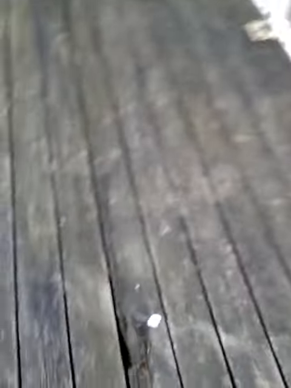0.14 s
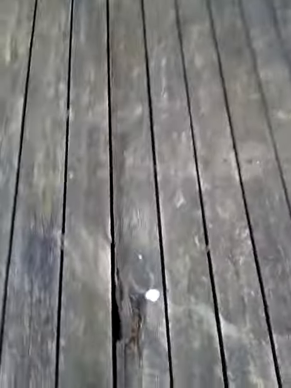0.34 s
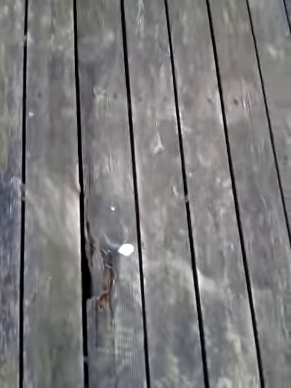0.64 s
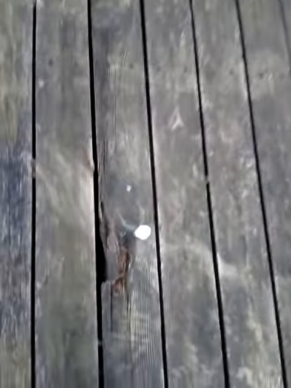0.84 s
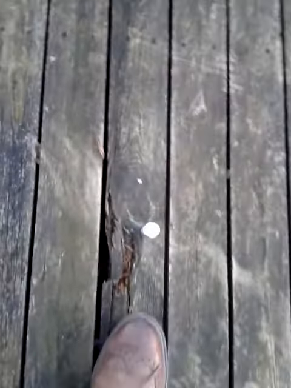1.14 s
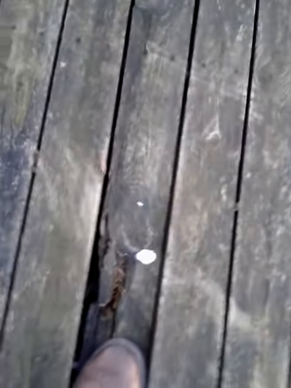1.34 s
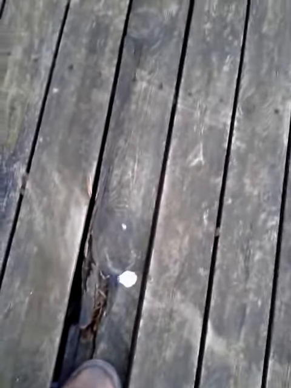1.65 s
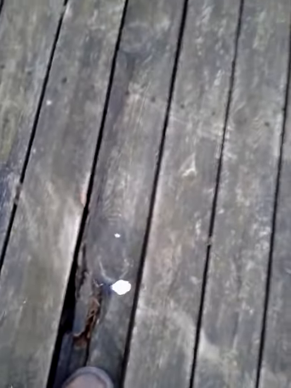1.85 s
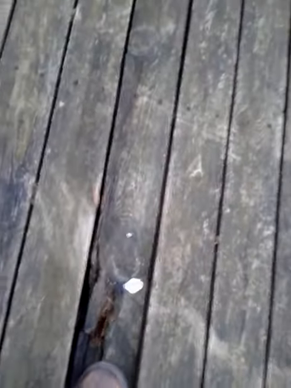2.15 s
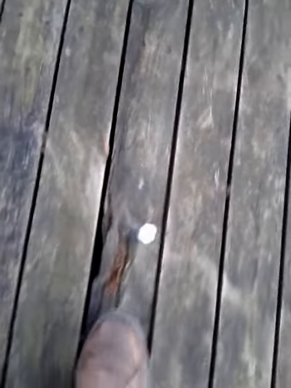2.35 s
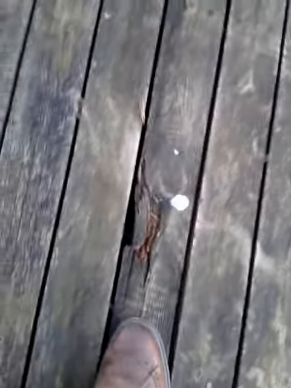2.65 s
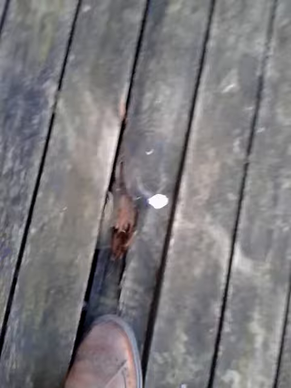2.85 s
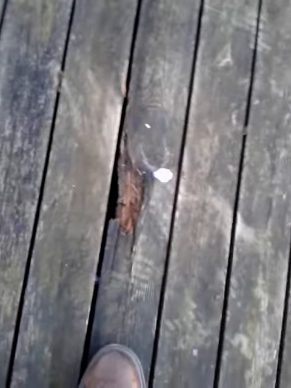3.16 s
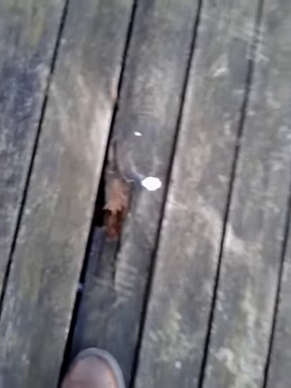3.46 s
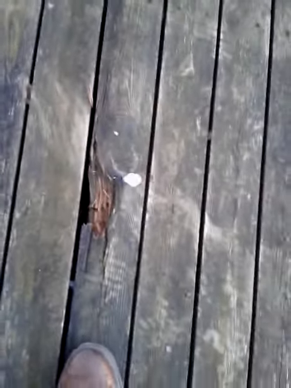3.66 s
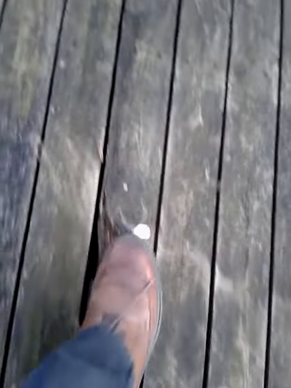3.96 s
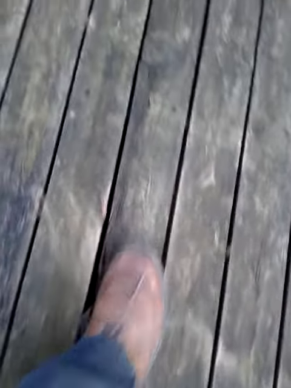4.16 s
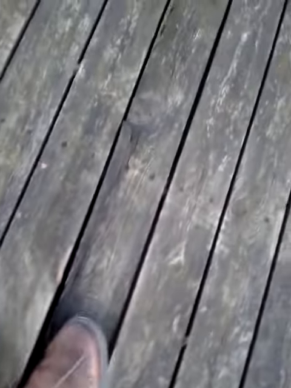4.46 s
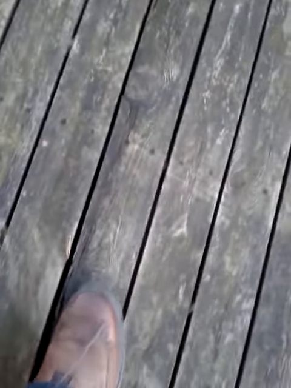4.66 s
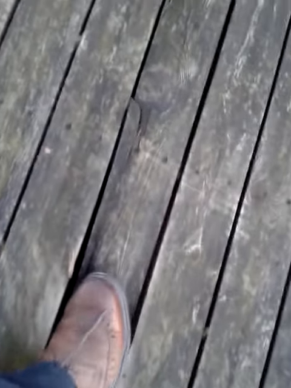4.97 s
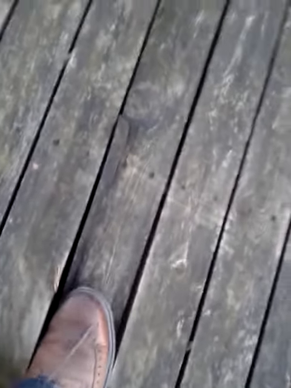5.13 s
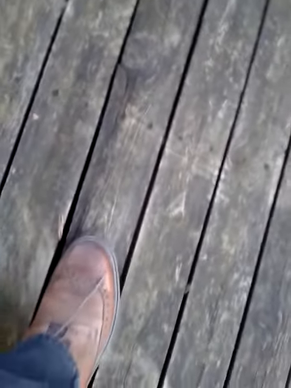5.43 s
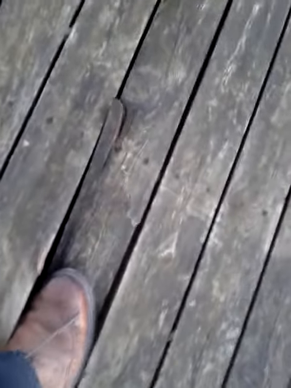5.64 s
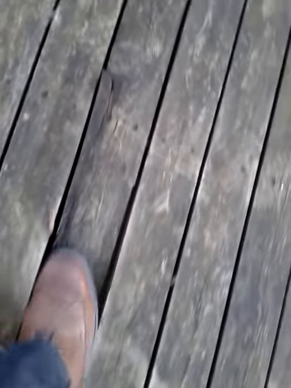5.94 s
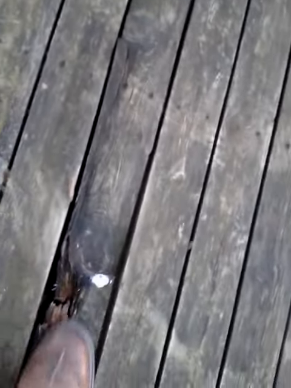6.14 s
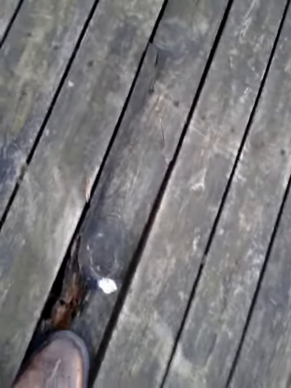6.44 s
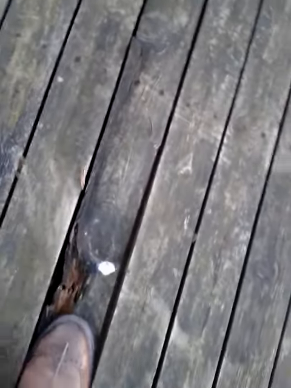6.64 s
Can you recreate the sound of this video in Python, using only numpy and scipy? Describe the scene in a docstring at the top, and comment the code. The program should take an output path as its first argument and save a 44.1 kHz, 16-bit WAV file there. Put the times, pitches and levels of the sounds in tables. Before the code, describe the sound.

Sharp, hollow board slaps, some overloading, break up quiet scuffing and soft thuds as someone steps about on an old timber deck.

```python
"""Scuffs of cloth and sole over soft outdoor air and faint rustle, then a boot works a loose, rotten plank.
Close by, the plank clacks on its joist: filtered chatter for crack and knock, decaying sines for the ring.
Dull footfalls stir mostly low modes; grit and splinters tick; gated noise makes the scuffs and a low rumble.
The hardest blows overload the input stage, which flattens their peaks."""
import sys
import numpy as np
from scipy import signal
from scipy.fft import rfft, irfft
from scipy.io import wavfile
from scipy.ndimage import uniform_filter1d

SR = 44100
rng = np.random.default_rng(int(sys.argv[2]) if len(sys.argv) > 2 else 0)


def master_out(mix):
    """Clip the mix to full scale and print it as 16-bit PCM to the path in sys.argv[1]."""
    frames = np.transpose(np.atleast_2d(mix))
    ceiling = np.clip(frames, -1, 1)
    pcm = np.round(ceiling * 32767).astype(np.int16)
    wavfile.write(sys.argv[1], SR, pcm)


N = 299880
AGE = np.arange(SR // 2) / SR  # time since a blow, s
BINS = np.fft.rfftfreq(4096, 1 / SR)  # filter frequencies, Hz

# loose plank hits, levels before filtering: t/s, crack level/dB, knock level/dB, deck ring level/dB,
# ring length/factor, favoured pitch f/Hz, lift at that pitch/dB, low edge f/Hz, top edge f/Hz
PLANK_HITS = [ (1.3184, -26.5, -42, -31, 1.15, 5800, 6, 300, 11800),
              (1.3230, -35, -46, -21, 0.35, 7740, 18, 250, 10600),
              (1.3676, -19, -28.5, -40, 0.9, 4300, 3, 302, 11800),
              (1.736, -21, -34, -30, 0.41, 6250, 8, 400, 12100),
              (1.7392, -21, -27, -28, 1.17, 7800, 10, 400, 12100),
              (1.7724, 6, 0, -9.5, 0.77, 503, 10, 347, 14400),
              (2.7530, -7, -12.5, -19.5, 1.03, 3690, 10, 152.4, 11300),
              (2.788, -7.5, -14.5, -9, 0.74, 3800, 2, 176, 8600),
              (4.3008, -20.5, -54, -47, 1.3, 5200, 7, 198, 9550),
              (4.3190, -5, -17.5, -31, 0.77, 1480, 10.5, 222, 11200),
              (4.3245, -17.5, -16, -23, 0.71, 5630, 15, 219, 11000),
              (4.3506, -7, -42, -45, 0.91, 3950, 1, 151, 5800),
              (4.9884, -24, -36, -39, 1.3, 1600, 9, 250, 8400),
              (5.0064, -3.5, -9.5, -39, 1.23, 1550, -1.5, 286, 9100),
              (5.028, 8, 2.5, -21, 0.9, 1030, 1.5, 314, 9100),
              (5.043, -3, -4.5, -22, 0.7, 1600, 1.5, 279, 8800),
              (5.677, 10, 7, 0, 0.79, 1640, 7.5, 119, 8950), (5.6960, -1, 3, 0.5, 0.8, 255, 1, 40.3, 8900)]
# dull footfalls: t/s, deck ring level/dB, knock level/dB, favoured pitch f/Hz, deck sway level/dB
STEPS = [ (0.377, -39, -41.5, 340, -46), (1.022, -39, -46, 344, -63), (1.7115, -26.5, -37, 327, -51),
         (2.0202, -26.5, -26, 222, -42), (2.1513, -23, -29, 250, -50), (2.394, -30, -32, 540, -52.5),
         (2.7264, -21, -28.5, 340, -38), (3.3659, -22, -33, 358, -39), (3.492, -39, -63, 200, -42),
         (3.851, -36, -62, 112, -44.5), (4.147, -33.5, -48, 323, -43.5), (4.291, -25, -28, 275, -36.5),
         (4.398, -32.5, -60, 210, -45), (4.443, -36.5, -42, 206, -51), (4.9608, -18.5, -28, 310, -51),
         (5.332, -27.5, -29, 605, -38.5), (6.3614, -16.5, -23.5, 280, -56), (6.7406, -21, -25.5, 644, -36)]
# modes of the deck: f/Hz, relative level/dB, t60/s before the length factor
DECK_MODES = [(67, -12.5, 0.25), (103, -11, .3), (210.8, -0.5, 0.18), (226, 1.5, 0.21),
              (272.6, -5.5, 0.172), (338, 0, 0.12), (360.6, -2, 0.13), (425, -6, 0.21), (479.4, -3, 0.21),
              (524, 4, 0.042), (580, -8, 0.21), (651, -15, 0.23), (747, -1, 0.078)]
# colour of the plank's hollow knock: f/Hz, relative density/dB per Hz
KNOCK_COLOUR = [(40, -15.5), (250, -7.5), (600, 0), (900, 2.5), (1200, 1.5), (1700, 4.5), (2100, -6.5),
                (3000, -3.5), (8000, -57.5)]
# colour of the plank's bright crack: f/Hz, relative density/dB per Hz
CRACK_COLOUR = [(100, -11.5), (1200, -9.5), (2200, -6), (2800, -10.5), (3600, -8), (5400, -4.5),
                (7500, -11), (11000, -16), (16000, -17)]


def clacks(contact=11, deck_length=0.93, plank_db=-10):
    """The plank slaps its joist: a bright crack, a hollow knock, and the rings of plank and deck."""
    # the plank's own modes: f/Hz, relative level/dB, t60/s before the length factor
    plank_modes = [(940, -5.5, 0.18), (961, -6, 0.12), (1192, 2, 0.15), (1394, -13, 0.29), (1614, -6, 0.29),
                   (1850, 4, 0.089), (3790, 13, .1), (3636, 1, 0.14), (5020, 7, 0.088), (6170, 1, 0.15)]
    out = np.zeros(N)
    crack = unit(amp(read(CRACK_COLOUR, BINS)))
    knock = unit(amp(read(KNOCK_COLOUR, BINS)))
    for s, crack_db, knock_db, deck_db, length, pitch_hz, lift_db, low_hz, top_hz in PLANK_HITS:
        # top_hz rolls off the treble, low_hz cuts the bass
        band = above(BINS, low_hz) / np.hypot(1, (BINS / top_hz) ** 4)
        blend = np.hypot(amp(crack_db) * crack, amp(knock_db) * knock)
        colour = blend * band * lift(BINS, pitch_hz, lift_db)
        plank_ring = modes(plank_modes, pitch_hz, lift_db, length, build_s=0.00074, detune=0.011)
        deck_ring = modes(DECK_MODES, pitch_hz, lift_db, deck_length * length, build_s=0.0017, low_hz=low_hz)
        add(out, s, coloured(timber(length, contact), colour))
        add(out, s, amp(knock_db + plank_db) * plank_ring)
        add(out, s, amp(deck_db) * deck_ring)
    return out


def footfalls(length=1.0, contact=12):
    """The rubber sole lands softly, so mostly the low modes answer."""
    # colour of a footfall's knock: f/Hz, relative density/dB per Hz
    sole_colour = [(40, -10.5), (250, -6), (500, -3), (800, -0.5), (1100, -4), (1600, 0), (2200, -14.5),
                   (3200, -12.5), (8000, -55.5)]
    # a flatter step has a lower pitch and stirs the joist more; level relative to its deck ring
    joist_hz, joist_db, joist_t60_s = 93.6, 19, 0.069
    out = np.zeros(N)
    knock = unit(amp(read(sole_colour, BINS)))
    joist = amp(joist_db - 60 * AGE / joist_t60_s) * np.sin(2 * np.pi * joist_hz * AGE)
    for s, deck_db, knock_db, pitch_hz, _ in STEPS:
        deck_ring = modes(DECK_MODES, pitch_hz, lift_db=5.5, length=0.79, build_s=0.00093)
        add(out, s, amp(knock_db) * coloured(timber(length, contact), knock))
        add(out, s, amp(deck_db) * deck_ring)
        add(out, s, amp(deck_db) * above(joist_hz, pitch_hz) * joist)
    return out


def ticks(level_db=2, contact=14, knock_share=0.8, lift_db=11, octaves=0.35):
    """Splinters snap at their own pitches, and each footfall cracks a grain of grit at one fixed pitch."""
    # splinters snapping under the sole: t/s, level/dB before level_db, f/Hz
    splinters = [ (1.095, -46, 6100), (1.361, -35, 6000), (2.554, -41, 2100), (2.878, -41, 2200),
                 (4.122, -37, 1560), (4.947, -33.5, 1940), (5.875, -34, 2020), (5.931, -31, 5030),
                 (5.967, -33, 1470), (6.055, -33, 5830), (6.153, -35.5, 1670), (6.550, -49.5, 2140)]
    grit_db, grit_hz = -13.5, 5010  # level relative to the footfall's knock, before level_db
    out = np.zeros(N)
    wood = amp(read(CRACK_COLOUR, BINS)) + knock_share * amp(read(KNOCK_COLOUR, BINS))
    underfoot = [(s, knock_db + grit_db, grit_hz) for s, _, knock_db, _, _ in STEPS]
    for s, db, pitch_hz in list(splinters) + underfoot:
        snap = timber(.55, contact)
        colour = unit(wood * lift(BINS, pitch_hz, lift_db, octaves))
        add(out, s, amp(db + level_db) * coloured(snap, colour))
    return out


def scuffs(swish_db=-1, scrape_db=0, brush_cloth_db=-3, grit_db=-3, grains_per_s=320, grain_spread_db=4,
           flutter_db=2.0):
    """Cloth swishes and the sole scrapes in uneven catches, dragging fine grit along."""
    # rubs as the leg moves: start t/s, time until release/s, cloth level/dB before swish_db,
    # sole level/dB before scrape_db
    leg_moves = [ (0.053, 1.36, -61, -55.5), (0.586, 0.081, -50, -53), (1.242, 0.053, -43, -38.5),
                 (1.84, 0.15, -51.5, -50), (1.973, 0.047, -51, -36), (2.13, 0.12, -45, -45.5),
                 (2.366, 0.12, -45.5, -47), (2.853, 0.082, -46, -44), (2.986, 0.13, -44.5, -45.5),
                 (3.3, 0.039, -48, -42), (3.367, 0.23, -53, -51.5), (4.088, 0.051, -50.5, -45),
                 (4.413, 0.42, -59.5, -60), (5.068, 0.15, -44.5, -44.5), (5.587, 0.054, -39, -38.5),
                 (5.792, 0.065, -43, -39), (5.942, 0.13, -37.5, -38), (6.086, 0.13, -42.5, -42),
                 (6.378, 0.068, -51, -56)]
    # colour of the trouser cloth: f/Hz, relative density/dB per Hz
    swish_colour = [(1200, -19), (2400, 7.5), (3400, 0.5), (5000, 2), (6500, 2), (8500, -5.5),
                    (12000, -16.5), (16000, -33.5)]
    # colour of the sole on the boards: f/Hz, relative density/dB per Hz
    scrape_colour = [(80, -7.5), (250, 9.5), (500, 6), (1000, 1.5), (1600, 8), (2100, 6.5), (3000, -9),
                     (6000, -25.5)]
    attack_s, release_s = 0.024, 0.024
    # every footfall brushes the boards as it lands; level relative to its knock
    brush_db, brush_lead_s, brush_hold_s = -15, 0.035, 0.01

    rubs = [(start, length, cloth_db + swish_db, sole_db + scrape_db)
            for start, length, cloth_db, sole_db in leg_moves]
    rubs += [(s - brush_lead_s, brush_lead_s + brush_hold_s, knock_db + brush_db + brush_cloth_db,
              knock_db + brush_db) for s, _, knock_db, _, _ in STEPS]
    cloth_power, sole_power = np.zeros((2, N))
    for start, length, cloth_db, sole_db in rubs:
        stroke = swell(attack_s, length, release_s)
        add(cloth_power, start, (amp(cloth_db) * stroke) ** 2)
        add(sole_power, start, (amp(sole_db) * stroke) ** 2)

    sizes = amp(grain_spread_db * np.minimum(rng.exponential(1, N), 4)) * rng.choice([-1, 1], N)
    grit = unit(sizes * (rng.random(N) < grains_per_s / SR))
    flutter = amp(flutter_db * wander(31.8))
    friction = flutter * (rng.standard_normal(N) + amp(grit_db) * grit)
    swish = coloured(np.sqrt(cloth_power) * friction, unit(amp(read(swish_colour, BINS))))
    scrape = coloured(np.sqrt(sole_power) * friction, unit(amp(read(scrape_colour, BINS))))
    return swish + scrape


def rumble(steady_db=-51, lumps_db=2.5, plank_sway_db=-47):
    """A lumpy low rumble swells each time weight comes onto the deck."""
    # colour of the rumble: f/Hz, relative density/dB per Hz
    rumble_colour = [(12, -11.5), (38, 1), (55, -0.5), (80, -1.5), (110, -7.5), (200, -9.5), (320, -20.5),
                     (700, -73)]
    power = np.full(N, amp(steady_db) ** 2)
    sway = swell(attack_s=0.076, hold_s=0.15, release_s=0.13)
    # a blow with weight behind it also shakes the joists; level relative to its deck ring
    thud_db, thud_hz = -19.5, 55
    thud = amp(thud_db) * swell(attack_s=0.009, hold_s=0.0374, release_s=0.062)
    for s, _, _, _, sway_db in STEPS:
        add(power, s, (amp(sway_db) * sway) ** 2)
    for s, _, _, deck_db, _, _, _, low_hz, _ in PLANK_HITS:
        add(power, s, (amp(plank_sway_db) * sway) ** 2)
        add(power, s, (amp(deck_db) * above(thud_hz, low_hz) * thud) ** 2)
    lumps = amp(lumps_db * wander(20))
    return np.sqrt(power) * unit(lumps * noise(rumble_colour))


def air_and_rustle(air_db=-48, extra_db=3.5, ease_s=2.4):
    """A soft wash of outdoor air and faint cloth rustle: filtered noise easing towards a steady level."""
    # colour of the air and cloth rustle: f/Hz, relative density/dB per Hz
    wash_colour = [(40, -4.5), (120, -7), (250, 0), (400, -4), (800, -4), (1500, -7), (2000, -14.5),
                   (2700, -20.5), (3600, -21.5), (5800, -17.5), (8000, -26.5), (11000, -30), (16000, -32.5)]
    easing = np.exp(-np.arange(N) / SR / ease_s)
    return amp(air_db + extra_db * easing) * noise(wash_colour)


def timber(length, contact, late_db=-46, late_t60=0.81, chatter_db=4, clump_db=1.5):
    """A contact spike, then chatter fading at its own rate per frequency, and a faint echo from the house."""
    # decay of the chatter: f/Hz, t60/s before the length factor
    ring_decay = [(100, 0.38), (300, 0.17), (700, 0.11), (1600, 0.096), (4000, 0.096), (8000, 0.098),
                  (15000, 0.096)]
    count = len(AGE)
    sizes = amp(chatter_db * np.minimum(rng.exponential(1, count), 3)) * (rng.random(count) < .2)
    # the wood rebounds, so the chatter comes in clumps a few milliseconds long
    drift = unit(uniform_filter1d(rng.standard_normal(count), size=130))
    clumps = amp(clump_db * np.tanh(drift) * 2)
    chatter = unit(sizes * clumps * rng.choice([-1., 1.], count))
    hz, t, z = signal.stft(chatter, SR, nperseg=256)
    early = amp(-60 * t / (length * read(ring_decay, hz)[:, None]))
    echo = amp(late_db - 60 * t / late_t60)
    ring = signal.istft(z * (early + echo), SR, nperseg=256)[1][:count]
    ring[0] = contact
    return ring


def modes(table, pitch_hz, lift_db, length, build_s, low_hz=30, scatter_db=2, detune=0.023):
    """Modes swell as the blow spreads through the timber; each blow stirs them a little differently."""
    hz, db, t60 = np.transpose(table)[:, :, None]
    size, shift, phase = rng.standard_normal((3, len(table), 1))
    gains = amp(db + scatter_db * size)
    gains = gains / np.linalg.norm(gains) * lift(hz, pitch_hz, lift_db) * above(hz, low_hz)
    decays = amp(-60 * AGE / (t60 * length))
    tones = np.sin(2 * np.pi * (hz * (1 + detune * shift) * AGE + phase))
    return np.sqrt(2) * (gains * decays * tones).sum(0) * (1 - np.exp(-AGE / build_s))


def lift(hz, pitch_hz, lift_db, octaves=0.19):
    """The place of contact lifts (or, if negative, dips) the modes near one pitch: a bell-shaped gain."""
    return amp(lift_db * np.exp(-.5 * (np.log2((hz + 1) / pitch_hz) / octaves) ** 2))


def above(hz, edge_hz):
    """Gain of a low cut, 18 dB per octave well below the edge."""
    return 1 / np.hypot(1, (edge_hz / (hz + 1)) ** 3)


def swell(attack_s, hold_s, release_s):
    """Rises smoothly, holds until hold_s after its start, then dies away exponentially."""
    t = np.arange(2 * SR) / SR
    rise = np.sin(np.pi / 2 * np.minimum(t / attack_s, 1)) ** 2
    return rise * np.exp(-np.maximum(t - hold_s, 0) / release_s)


def coloured(x, gain):
    """Passes x through a causal, minimum-phase filter with the given gain per frequency."""
    log_gain = np.log(np.maximum(gain, 1e-5))
    circle = np.concatenate([log_gain, log_gain[-2:0:-1]])
    # the Hilbert transform of the log gain gives the phase
    taps = np.fft.ifft(np.exp(np.conj(signal.hilbert(circle)))).real
    return signal.fftconvolve(x, taps[:len(gain)])[:len(x)]


def noise(colour, size=N):
    """Noise of rms 1 with the given spectrum."""
    gain = amp(read(colour, np.fft.rfftfreq(size, 1 / SR)))
    return unit(irfft(rfft(rng.standard_normal(size)) * gain, size))


def wander(cutoff_hz):
    """Smooth random drift of rms 1: low-passed noise."""
    smoother = signal.butter(2, cutoff_hz, fs=SR, output="sos")
    return unit(signal.sosfilt(smoother, rng.standard_normal(N)))


def amp(db):
    """Decibels to gain."""
    return 10 ** (np.asarray(db) / 20)


def unit(x):
    """Scales to rms 1."""
    return x / np.sqrt(np.mean(x ** 2) + 1e-20)


def read(points, hz):
    """Reads a table on a log-frequency axis."""
    f, value = np.transpose(points)
    return np.interp(np.log(hz + 1), np.log(f + 1), value)


def add(mix, s, sound):
    """Mixes a sound in at time s."""
    part = mix[round(s * SR):][:len(sound)]
    part += sound[:len(part)]


def scene():
    """Boot, plank and deck in the open air."""
    return (clacks() + footfalls() + ticks() + scuffs() + rumble() + air_and_rustle())[None]


def record(dry, ceiling=0.64, edge_hz=16000):
    """The input stage flattens the loudest peaks; then a low-pass limits the band."""
    clipped = dry / (1 + (dry / ceiling) ** 6) ** (1 / 6)
    taps = signal.firwin(255, edge_hz, window=("kaiser", 8), fs=SR)
    return signal.oaconvolve(clipped, taps[None], "same")


dry = scene()
out = record(dry)
master_out(out)
```